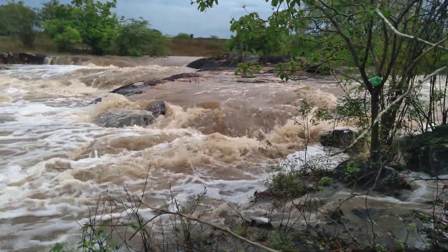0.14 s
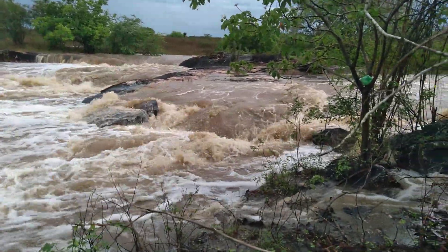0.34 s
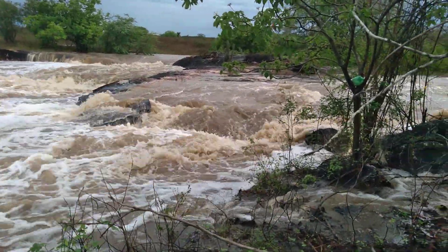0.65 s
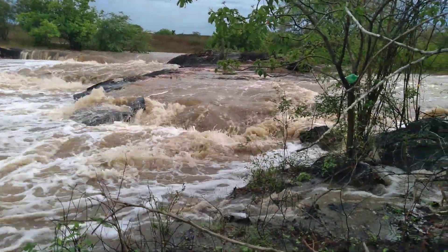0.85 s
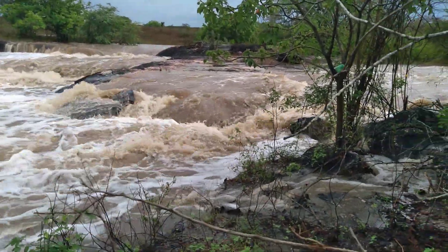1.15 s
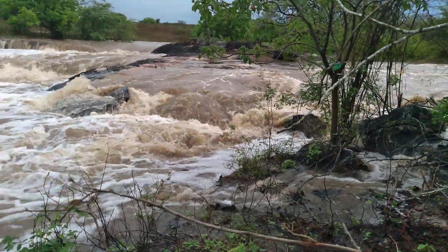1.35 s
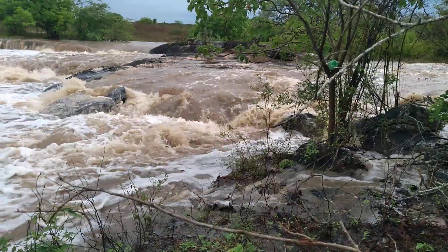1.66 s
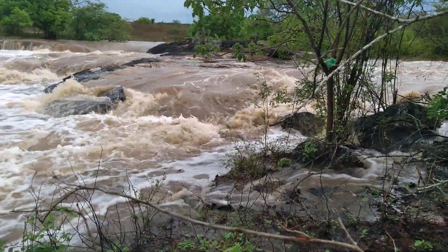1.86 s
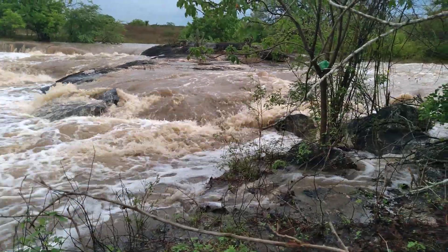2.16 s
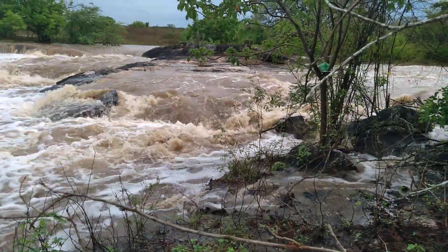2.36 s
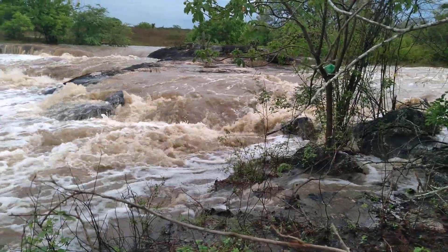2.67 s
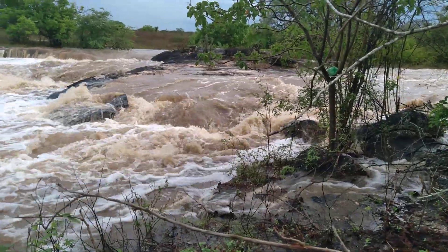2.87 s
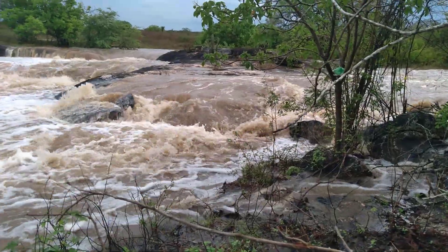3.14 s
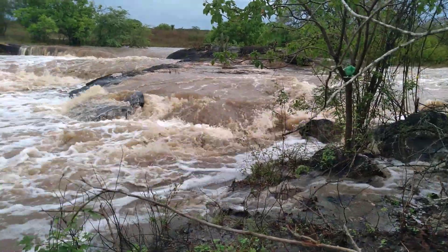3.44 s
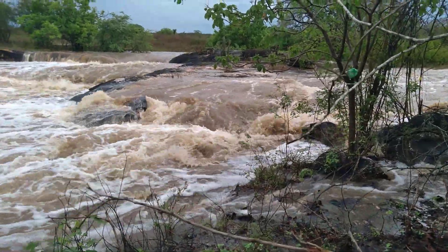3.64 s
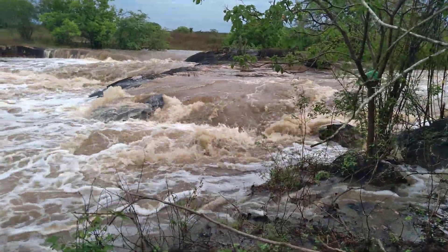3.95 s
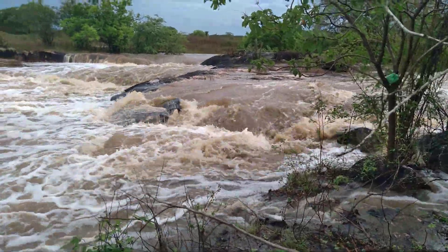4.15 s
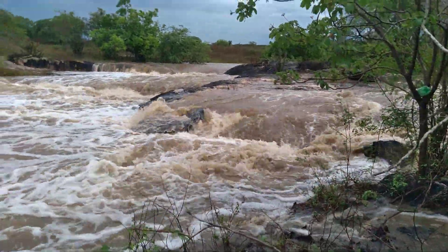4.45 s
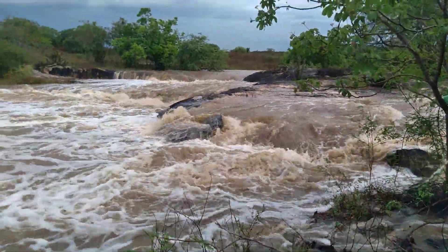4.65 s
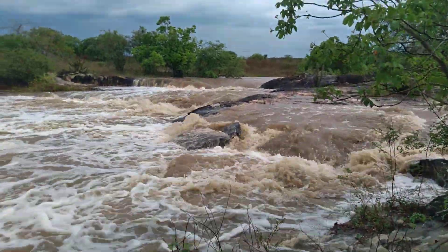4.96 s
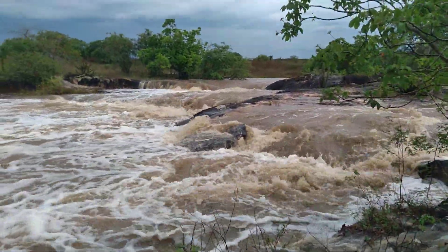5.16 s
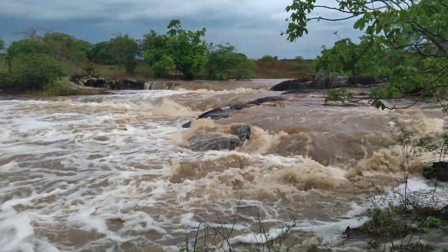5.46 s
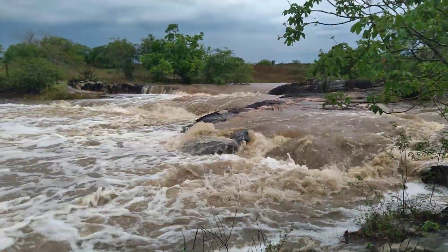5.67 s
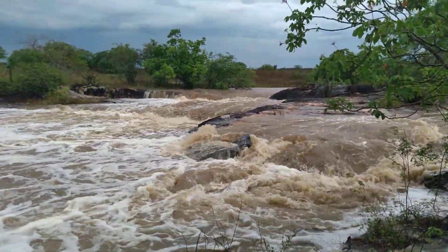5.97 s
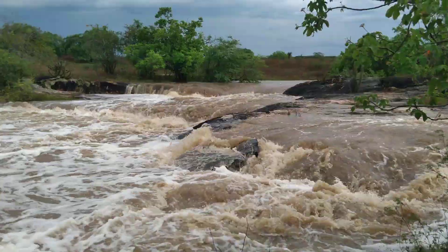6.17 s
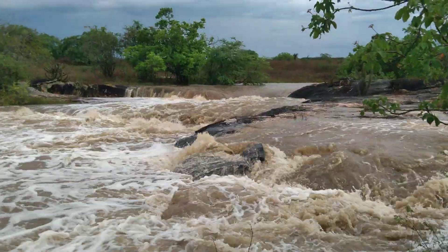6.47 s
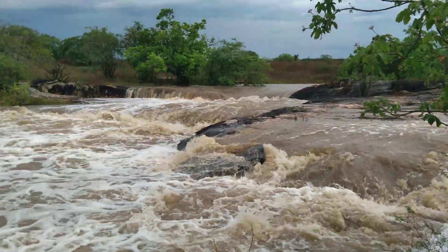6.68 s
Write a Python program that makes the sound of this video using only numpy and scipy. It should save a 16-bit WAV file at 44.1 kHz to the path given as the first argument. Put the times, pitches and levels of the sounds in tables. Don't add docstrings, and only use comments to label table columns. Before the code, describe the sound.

Muddy floodwater roars steadily over rock ledges close by, a dense hissing, churning wash with low surges and faint dull gulps.

```python
import sys
import numpy as np
from scipy import signal
from scipy.fft import rfft, irfft
from scipy.io import wavfile

SR = 44100
rng = np.random.default_rng(int(sys.argv[2]) if len(sys.argv) > 2 else 0)


def magnitude_from_level(level_db):
    exponent = np.asarray(level_db, float) / 20
    return 10 ** exponent


def unload_wav(signal):
    wavfile.write(
        sys.argv[1],
        SR,
        np.round(np.clip(np.atleast_2d(signal).T, -1, 1) * 32767).astype(np.int16),
    )


N = 300321
T = np.arange(N) / SR
FRAME = 2048


def level(x, db):
    return x * magnitude_from_level(db) / np.sqrt(np.mean(x ** 2))


def bell(x, centre, spread):
    return np.exp(-((x - centre) / spread) ** 2 / 2)


def colour(table, hz):
    f, db = np.transpose(table)
    return np.interp(np.log(hz + 1), np.log(f), db)


def swing(table, s):
    times, db = np.transpose(table)
    path = np.interp(s, times, db)
    return path - path.mean()


def spots(events, hz, s, width_hz, length_s):
    return sum(db * np.outer(bell(hz, at_hz, width_hz), bell(s, at_s, length_s))
               for at_s, at_hz, db in events)


def patches(hz, s, width_hz, length_s):
    field = rng.standard_normal((len(hz), len(s)))
    for axis, cells in enumerate((width_hz / hz[1], length_s / s[1])):
        size = field.shape[axis]
        blur = np.exp(-(np.pi * np.fft.rfftfreq(size) * cells) ** 2 / 2)
        field = irfft(rfft(field, axis=axis) * np.expand_dims(blur, 1 - axis), size, axis=axis)
    return field / field.std()


def shape(x, gain_db, size):
    overlap = size * 7 // 8
    hz, s, z = signal.stft(x, SR, nperseg=size, noverlap=overlap)
    return signal.istft(z * magnitude_from_level(gain_db(hz, s)), SR, nperseg=size, noverlap=overlap)[1][:N]


def bubbles(per_s, cycles, scatter_db):
    out = 0
    for hz in 500 * 2 ** np.arange(0, 5, 1 / 3):
        when, size = rng.random(N), rng.exponential(size=N)
        bursts = (when < per_s * hz / 1000 / SR) * magnitude_from_level(scatter_db * np.minimum(size, 6))
        pole = np.exp(2j * np.pi * hz / SR - hz / SR / cycles)
        ring = signal.lfilter([1], [1, -pole], bursts).imag
        out = out + np.sqrt(hz) * level(ring, 0)
    return level(out, 0)


def splash_db(hz, s):
    flicker = 0.19 * patches(hz, s, 5000, 0.0072)
    flicker = flicker + 0.32 * patches(hz, s, 1200, 0.0071)
    flicker = flicker + 0.57 * patches(hz, s, 950, 0.022)
    lumps = 1.76 * bell(hz, 600, 280)[:, None] * patches(hz, s, 160, 0.012)
    return np.clip(hz / 12000, 0.15, 1)[:, None] * flicker + lumps


# [f/Hz, level/dB per Hz]
WATER = [(380, -38.5), (480, -14), (600, -3), (1200, 0.5), (1750, 1), (2950, -3), (3500, -6.5), (4300, -11),
         (5100, -4.5), (6000, -4), (7500, 1), (9500, -2), (13000, -8), (15600, -5.5)]
# [t/s, level/dB]
FLOW = [(0, -24), (.3, -24.5), (.4, -23.5), (.75, -24), (1.3, -23.5), (1.45, -24.5), (1.95, -23.5),
        (2.3, -24.5), (2.75, -23.5), (3.1, -24.5), (3.8, -23), (4.25, -24), (4.8, -24.5), (5.1, -24.5),
        (5.8, -24), (5.95, -24), (6.4, -24.5), (6.81, -24.5)]
# [t/s, level/dB]
TURN = [
    (0, 0.5),
    (2.7, 1.5),
    (3.3, -0.5),
    (4.2, -0.5),
    (4.8, -1.5),
    (6.0, -2),
    (6.81, -3.5),
]
# [f/Hz, share 0-1]
TURN_SHARE = [(500, 0), (750, 0.7), (1100, 0), (2000, 0.28), (2400, 0.7), (3000, 1.), (3900, .9), (5200, 0)]


def flow_db(hz, s):
    aim = np.outer(colour(TURN_SHARE, hz), swing(TURN, s))
    return colour(WATER, hz)[:, None] + swing(FLOW, s) + aim


# [t/s, centre f/Hz, swell level/dB]
SURGES = [(.13, 755, 5.5), (.26, 770, 3), (.45, 844, 6.5), (.73, 770, 8.5), (1.07, 520, 1.5),
          (1.07, 706, 3), (1.34, 745, 3.5), (1.53, 730, 3), (1.69, 537, 3.5), (1.92, 910, 5),
          (1.94, 470, 12), (2.02, 774, 6), (2.3, 523, 7.5), (2.62, 505, 6), (2.8, 530, 11.5),
          (3.05, 557, 7.5), (3.42, 495, 12), (3.65, 476, 14), (3.68, 700, 3), (4.04, 500, 3), (4.2, 746, 5),
          (2.9, 640, 1), (4.88, 530, 10), (5.03, 695, 6), (5.38, 647, 4), (5.69, 570, 5.5), (6.0, 520, 4.5),
          (6.15, 736, 10.5), (6.47, 530, 9)]
# [t/s, centre f/Hz, depth level/dB]
LULLS = [(0, 603, -10), (.29, 485, -19), (.6, 520, -5), (.84, 428, -11), (1.46, 453, -12), (1.81, 570, -5),
         (2.15, 520, -9), (2.35, 766, -7), (2.45, 600, -8), (2.73, 690, -5), (3.23, 656, -7),
         (4.08, 794, -7), (4.26, 500, -6), (4.46, 685, -5), (4.7, 600, -19), (4.92, 760, -16),
         (5.18, 600, -11), (5.18, 800, -8), (5.29, 430, -14), (5.6, 920, -3), (5.75, 930, -7),
         (5.86, 650, -10.5), (6.2, 430, -20), (6.33, 553, -2), (4.55, 480, -6), (2.97, 563, -5.5),
         (2.58, 780, -1), (6.8, 600, -2.5)]


def waves_db(hz, s):
    wave_hz, wave_s = 102, 0.06
    big = spots(SURGES, hz, s, wave_hz, wave_s) + spots(LULLS, hz, s, wave_hz, wave_s)
    quick = 1.3 * bell(hz, 730, 220)[:, None] * patches(hz, s, 130, 0.03)
    gentle = 0.34 * patches(hz, s, 1340, 0.07)
    return 1.01 * big + quick + gentle


# [t/s, centre f/Hz, lift level/dB]
SPRAY = [(.4, 8000, 1.5), (.6, 8150, 2), (1.1, 9000, 1), (1.9, 9000, 0.5), (2.2, 8000, 0.5),
         (2.65, 8000, 1), (3.0, 9000, 2), (3.3, 10800, 3), (3.5, 8000, 0), (3.7, 9000, 0), (4.2, 8000, 0.5),
         (4.7, 7900, 1), (5.3, 8000, 0), (5.5, 9000, 1), (5.9, 10000, 2)]


def spray_db(hz, s):
    return spots(SPRAY, hz, s, width_hz=4000, length_s=0.02)


# [f/Hz, width/Hz, depth level/dB, restlessness/dB]
HOLLOWS = [(567, 61, 2, 4.5), (837, 69, -6.5, 1), (2413, 118.5, -23.5, 13), (3280, 44, -7.5, 8),
           (3720, 113, -5.5, 6.5), (3890, 170, -5.5, 3), (3960, 82, -4, 3.5), (4106, 50, -14, 7),
           (4484, 74, -6, 9.5)]
# [t/s, f/Hz, depth level/dB]
HOLES = [(.2, 4080, -8), (.46, 3760, -11), (.56, 2380, -10), (.94, 3770, -24), (.96, 4150, -14),
         (.9, 2390, -8), (1.42, 3800, -17), (1.48, 3960, -13), (1.52, 2380, -11), (1.76, 3820, -12),
         (1.81, 4000, -12), (2.58, 2470, -10), (2.87, 4080, -12), (3.19, 4650, -15), (3.33, 3980, -22),
         (3.54, 4500, -12), (3.665, 4020, -32), (4.4, 3900, -8), (3.91, 4060, -11), (4.02, 3990, -11),
         (4.6, 4050, -13), (4.85, 3800, -10), (5.02, 2450, -9), (5.14, 4000, -15), (5.38, 3750, -12),
         (6.0, 4050, -15), (6.25, 3900, -12), (6.3, 3380, -12), (6.48, 4030, -17), (6.77, 3380, -11)]


def suppressor_db(hz, s):
    hunting = patches(hz, s, 72, 0.026)
    hunting = hunting - 0.18 * hunting ** 2
    place_hz = hz[:, None] + 38 * patches(hz, s, 240, 0.088)
    db = spots(HOLES, hz, s, width_hz=80, length_s=0.036)
    for centre_hz, width_hz, depth_db, restless_db in HOLLOWS:
        db = db + depth_db * bell(place_hz, centre_hz, width_hz)
        db = db + restless_db * hunting * bell(hz, centre_hz, width_hz * np.sqrt(2))[:, None]
    return db


def rapids():
    def gain_db(hz, s):
        return flow_db(hz, s) + waves_db(hz, s) + spray_db(hz, s) + suppressor_db(hz, s)

    far = rng.standard_normal(N)
    near = magnitude_from_level(-7) * bubbles(per_s=60, cycles=1.76, scatter_db=1.5)
    splashing = shape(far + near, splash_db, size=FRAME // 4)
    return level(shape(splashing, gain_db, size=FRAME), -23)


# [f/Hz, level/dB per Hz]
RUMBLE = [(13, -45), (22, -27), (70, 0.5), (136, 0.5), (223, -2), (278, -4), (342, -11), (400, -10),
          (520, -19), (880, -120)]
# [t/s, strength level/dB, length/s]
GUSTS = [(0, 9, 0.17), (0.605, 13, 0.11), (1.153, 11, 0.04), (1.552, 10, .15), (1.97, 9, 0.048),
         (2.42, 7, .08), (2.98, 3, .1), (3.33, 11, .06), (3.94, 5, 0.09), (4.46, 5, .06),
         (5.123, 11, 0.053), (5.45, 0, .1), (6.262, 16, 0.11), (6.68, 11.5, 0.16)]


def rumble():
    hz = np.fft.rfftfreq(N, 1 / SR)
    tail = [(520, -30), (2000, -70)]
    spectrum = rfft(rng.standard_normal(N)) * magnitude_from_level(colour([*RUMBLE, *tail], hz))
    bottom = 1 / (1 + (hz / 130) ** 4)
    gust = magnitude_from_level(sum(db * bell(T, s, length_s) for s, db, length_s in GUSTS) - 5)
    windy = gust * irfft(spectrum * bottom, N)
    steady = irfft(spectrum * (1 - bottom), N)
    return level(windy + steady, -53)


# [t/s, peak level/dB, f/Hz, length/s]
GULPS = [(0.038, -38, 147, 0.033), (0.11, -41, 161, 0.026), (0.493, -46, 169, 0.044),
         (0.554, -33.5, 165, 0.035), (0.626, -39, 200, 0.028), (0.808, -37, 167, 0.023),
         (1.081, -32, 198, 0.033), (1.145, -38, 177, 0.026), (1.504, -44, 164, 0.045),
         (1.552, -40.5, 196, 0.038), (1.786, -45, 177, 0.039), (2.105, -47, 182, 0.025),
         (2.35, -37.5, 255, 0.035), (2.646, -42, 195, 0.043), (2.743, -47, 210, 0.035),
         (3.035, -44, 235, 0.035), (3.624, -45, 178, 0.035), (3.814, -46, 127, 0.032),
         (3.975, -44, 216, 0.035), (4.414, -39, 161, 0.032), (4.445, -36, 180, 0.026),
         (4.913, -48, 151, 0.032), (5.115, -42, 91.5, 0.039), (5.211, -34, 232, 0.034),
         (6.004, -49, 188, 0.037), (6.196, -41, 191, 0.044), (6.235, -46, 96.9, 0.038),
         (6.322, -50, 113, 0.036)]
# [t/s, peak level/dB, f/Hz, length/s]
PLOPS = [
    (1.7, -40, 445, 0.034),
    (5.95, -42.5, 320, 0.042),
    (3.2, -40, 447, 0.03),
]


def gulps():
    out = np.zeros(N)
    for events in (GULPS, PLOPS):
        for s, db, hz, length_s in events:
            near = (T > s) & (T < s + 4 * length_s)
            age_s = T[near] - s
            rise = age_s / length_s / 0.24
            swell = rise ** 2.4 * np.exp(2.1 * (1 - rise))
            out[near] += magnitude_from_level(db + 1) * swell * np.sin(2 * np.pi * hz * age_s * (1.05 - 1.6 * age_s))
    return out


def scene():
    return np.tile(rapids() + rumble() + gulps(), (2, 1))


# [t/s, low f/Hz, high f/Hz, level/dB]
SIDE_BURSTS = [(.005, 9000, 12100, -40), (.76, 9300, 11200, -39), (.76, 12000, 14500, -41),
               (.97, 5440, 6950, -36), (2.48, 9350, 11200, -39), (2.735, 6250, 8400, -34),
               (3.06, 7440, 9900, -36), (3.547, 4500, 5960, -46), (4.058, 8900, 10300, -37),
               (4.127, 14200, 15700, -41), (4.778, 7440, 9200, -37), (4.778, 10700, 12500, -43),
               (4.778, 13300, 15200, -43), (4.894, 5440, 7750, -38), (4.894, 12300, 14700, -43),
               (5.497, 4100, 5180, -48), (5.497, 12300, 13800, -53), (6.403, 14100, 15700, -40)]


def side_noise():
    side, hz = np.zeros(N), np.fft.rfftfreq(FRAME, 1 / SR)
    for s, low_hz, high_hz, db in SIDE_BURSTS:
        band = irfft(rfft(rng.standard_normal(FRAME)) * (hz > low_hz) * (hz < high_hz))
        burst = level(band, db + 3.5) * np.hanning(FRAME)
        at = int(s * SR) + np.arange(FRAME) - FRAME // 2
        inside = at >= 0
        side[at[inside]] += burst[inside]
    return side * np.array([[1], [-1]])


def top_cut(x):
    return signal.sosfilt(signal.butter(12, 17080, fs=SR, output="sos"), x)


def record(dry):
    top_hz = 15740
    spectrum = rfft(dry + side_noise()) * (np.fft.rfftfreq(N, 1 / SR) < top_hz)
    return top_cut(irfft(spectrum, N))


dry = scene()
out = record(dry)
unload_wav(out)
```